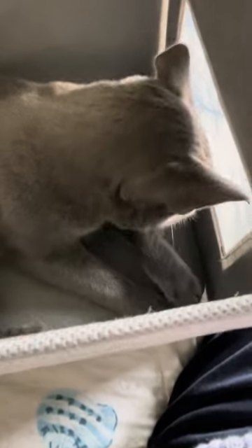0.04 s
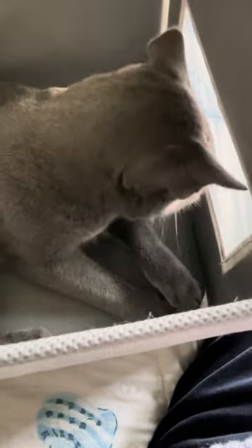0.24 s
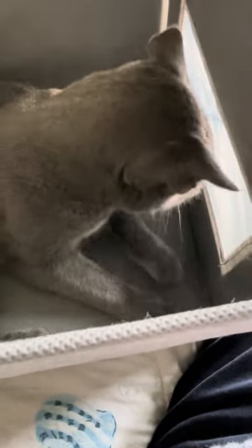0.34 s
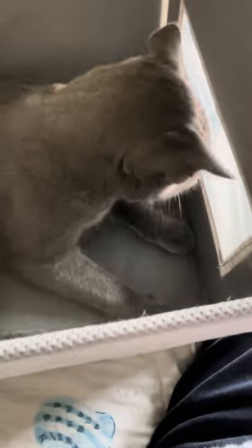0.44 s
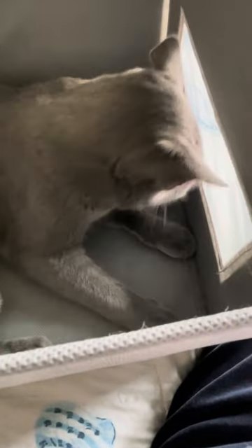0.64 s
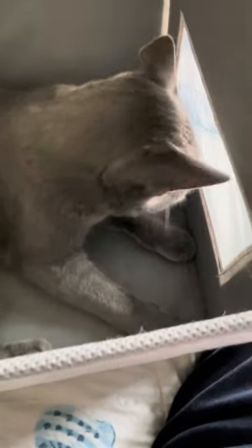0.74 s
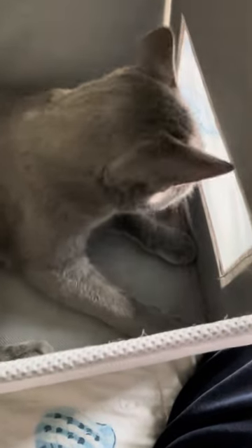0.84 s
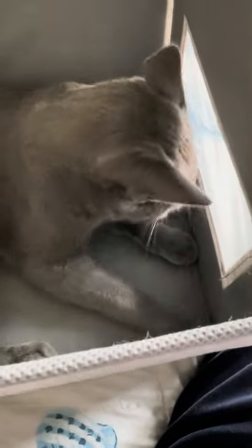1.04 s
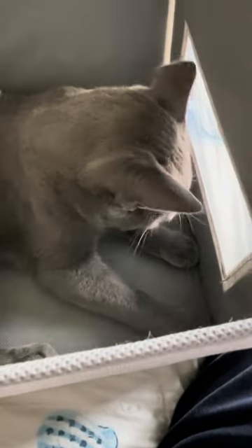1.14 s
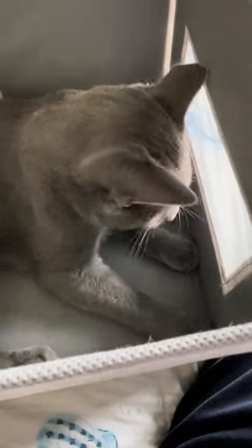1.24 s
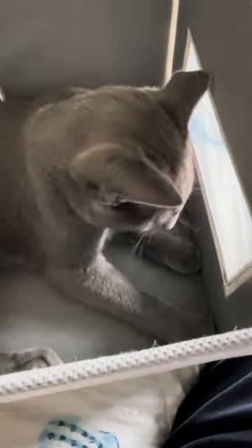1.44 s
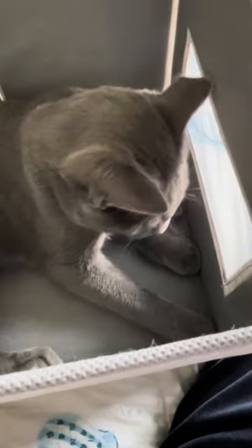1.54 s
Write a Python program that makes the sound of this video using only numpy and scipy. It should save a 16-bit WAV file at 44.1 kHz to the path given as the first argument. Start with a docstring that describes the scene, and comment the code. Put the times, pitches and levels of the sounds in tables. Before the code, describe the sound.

A kitten's paw knocks a cardboard box with one deep, hollow boom; after a near-quiet gap come light taps, claw ticks and soft rubs. Close stereo microphone in a small quiet room with a faint low hum.

```python
"""A cardboard box booms under one firm knock from a kitten's paw, close up in a quiet room.
The knock runs through the board as a fast falling chirp, and decaying sines ring the box after it.
Around it come soft rubs of filtered slips and noise, noisy claw ticks and tiny falling squeaks;
lighter paw taps follow as smaller chirps. Steady sines and coloured noise lie underneath as a low hum.
Noise tails add the box walls and the room."""
import sys
import numpy as np
from scipy import signal
from scipy.fft import rfft, irfft
from scipy.io import wavfile

SR = 44100
rng = np.random.default_rng(int(sys.argv[2]) if len(sys.argv) > 2 else 0)


def inscribe(sig):
    """Save sig as 16-bit PCM at rate SR to the path in sys.argv[1].

    A 1-D sig is mono; a 2-D sig holds one channel per row.
    Samples are clipped to [-1, 1] before scaling.
    """
    pcm = np.round(np.clip(np.atleast_2d(sig).T, -1, 1) * 32767)
    wavfile.write(sys.argv[1], SR, pcm.astype(np.int16))


N = 70560  # length in samples: 1.6 s


def amp(db):
    """Turns decibels into gain."""
    return 10 ** (np.asarray(db) / 20)


def unit(x):
    """Scales a signal to rms 1."""
    return x / np.sqrt(np.mean(x ** 2) + 1e-20)


def read(points, hz):
    """Reads a table with straight lines on a log-frequency axis."""
    f, value = np.transpose(points)
    return np.interp(np.log(hz + 1), np.log(f + 1), value)


def freqs(size):
    """Gives the bin frequencies of a transform, in Hz."""
    return np.fft.rfftfreq(size, 1 / SR)


def add(mix, s, sound):
    """Mixes a sound in at time s, cut off at the end of the mix."""
    part = mix[max(round(s * SR), 0):][:len(sound)]
    part += sound[:len(part)]


# likeness of left and right in diffuse sound: f/Hz, likeness (0 unrelated, 1 identical)
STEREO_LIKENESS = [(100, 0.98), (330, 0.65), (600, 0.61), (2000, 0), (5000, 0.8), (7200, 1), (8100, 1),
                   (12000, 0.5)]


def diffuse(pair, colour):
    """Colours two unrelated signals and blends them so that each band is partly alike left and right."""
    hz = freqs(N)
    a, b = rfft(pair, N)
    same = np.clip(read(STEREO_LIKENESS, hz), -1, 1)
    partner = same * a + np.sqrt(1 - same ** 2) * b
    return irfft(np.array([a, partner]) * amp(read(colour, hz)), N)


# steady hum partials: f/Hz, level/dB (rms)
HUM_PARTIALS = [(59.2, -61.5), (118.4, -64.5), (177.6, -76.5)]
# relative colour of the room noise: f/Hz, level/dB per Hz
NOISE_COLOUR = [(20, -16), (40, -2.5), (65, 1), (100, 1.5), (135, -5), (180, -19), (260, -18.5),
                (400, -32.5), (800, -37.5), (1800, -38), (3200, -42.5), (6500, -46), (11000, -53),
                (16000, -66)]
NOISE_DB = -61  # overall rms level


def background():
    """Steady sines make the low hum; coloured diffuse noise makes the faint air of the room."""
    t = np.arange(N) / SR
    hum = sum(amp(db) * np.sqrt(2) * np.sin(2 * np.pi * (hz * t + rng.random()))
              for hz, db in HUM_PARTIALS)
    noise = unit(diffuse(rng.standard_normal((2, N)), NOISE_COLOUR))
    return hum + amp(NOISE_DB) * noise


# faint squeaks as the paw slips on the board: t/s, length/s, start f/Hz, end f/Hz, peak level/dB
SLIP_SQUEAKS = [(0.039, 0.061, 1570, 1554, -81), (.76, 0.11, 524, 450, -74.5),
                (1.0612, 0.0026, 4520, 4380, -57.5)]


def squeaks():
    """Stick-slip sings a short tone that falls in pitch while it swells and fades."""
    out = np.zeros(N)
    for s, length, start_hz, end_hz, db in SLIP_SQUEAKS:
        u = np.linspace(0, 1, round(length * SR))
        pitch = start_hz + (end_hz - start_hz) * u
        tone = np.sin(2 * np.pi * np.cumsum(pitch) / SR)
        add(out, s, amp(db) * np.sin(np.pi * u) * tone)
    return out


BASS_HZ, TREBLE_HZ = 445, 3500  # shelf corners


def shelves(hz, bass_db, treble_db):
    """Gives the gain of smooth bass and treble shelves, in dB."""
    bass = bass_db / (1 + (hz / BASS_HZ) ** 4)
    treble = treble_db * hz ** 2 / (hz ** 2 + TREBLE_HZ ** 2)
    return bass + treble


DISPERSION = .88  # exponent: how steeply the travel time in the board grows towards the bass
HOLLOW_OCTAVES = 0.32  # spread of the hollow resonance


def blow(colour, db, bass_db=0, treble_db=0, travel_s=0, hollow_hz=1000, hollow_db=0, size=8192):
    """Bending waves disperse a coloured impulse: treble arrives first, so it chirps downwards."""
    hz = freqs(size)
    octaves = np.log2((hz + 1) / hollow_hz)
    hollow = hollow_db * np.exp(-.5 * (octaves / HOLLOW_OCTAVES) ** 2)
    log_gain = np.log(amp(read(colour, hz) + db + shelves(hz, bass_db, treble_db) + hollow))
    # minimum phase keeps the impulse causal
    phase = -signal.hilbert(np.r_[log_gain, log_gain[-2:0:-1]]).imag[:len(hz)]
    # travel_s holds at 1 kHz; the delay stops growing below 70 Hz
    delay = travel_s * (1000 / np.maximum(hz, 70)) ** DISPERSION
    travel_phase = 2 * np.pi * np.cumsum(delay) * hz[1]
    wave = irfft(np.exp(log_gain + 1j * (phase - travel_phase)))
    return wave[:size // 2] * signal.windows.tukey(size, .5)[size // 2:]


# claws catching the board: t/s, level/dB, treble shelf level/dB
CLAW_TICKS = [(.233, -41, -12), (.3625, -43.5, -13), (0.773, -44.5, -14), (0.854, -52, 9),
              (1.1481, -38.5, 8), (1.158, -53, 12), (1.1806, -40, 6.5), (1.2255, -27.5, 0.5),
              (1.232, -32.5, -23), (1.236, -41, -19), (1.382, -51, -11), (1.3916, -26, -1.5),
              (1.3997, -27.5, -9.5), (1.479, -46.5, 1), (1.554, -36, -12), (1.5591, -38, -6)]
# colour of a claw tick: f/Hz, level/dB
CLAW_COLOUR = [(100, -12), (600, -6), (1300, 3), (2400, 1.5), (3300, -9.5), (5200, -1), (7500, 1),
               (10000, -3), (13000, -14.5), (16000, -21.5)]
TICK_CRUMBLE, TICK_DECAY_S = 0.64, .0005  # fibre noise against the snap, and its decay time
TICK_TRAVEL_S = 0.00068  # at 1 kHz


def claws(size=512):
    """A claw snaps off the board in one sharp click, with a brief crumble of noisy fibres."""
    out, t = np.zeros(N), np.arange(size) / SR
    crumbles = rng.standard_normal((len(CLAW_TICKS), size))
    for (s, db, treble_db), fibres in zip(CLAW_TICKS, crumbles):
        snap = (t == 0) + TICK_CRUMBLE * fibres * np.exp(-t / TICK_DECAY_S)
        snap = snap / np.linalg.norm(snap)
        board = blow(CLAW_COLOUR, db, treble_db=treble_db, travel_s=TICK_TRAVEL_S)
        add(out, s, np.convolve(snap, board))
    return out


# paw and fur strokes: peak t/s, half width/s, level/dB, bass shelf level/dB, treble shelf level/dB
RUB_STROKES = [(.236, .006, -67.5, 15, -10), (.252, .003, -48, -3, -4.5), (.295, 0.024, -69.5, 10, -3),
               (0.397, 0.0091, -74.5, 10, -9), (.424, 0.017, -72, 19, 6.5), (.6, 0.074, -84.5, 3.5, 7),
               (0.673, 0.029, -74.5, 3, 2.5), (0.744, 0.015, -79, -22.5, -2.5),
               (0.779, 0.015, -65.5, -16, -5), (0.818, 0.015, -66.5, -13, -11.5),
               (.86, .025, -82.5, -1.5, 6), (0.959, 0.042, -81.5, 13.5, 2), (1.089, .014, -71, 14.5, 8),
               (1.124, 0.024, -75.5, 20.5, -15), (1.192, 0.024, -73, 8, 7.5),
               (1.232, 0.015, -61.5, 7, -10.5), (1.336, 0.013, -66.5, -5, -3), (1.394, 0.0098, -66, 17, 2),
               (1.413, 0.03, -73.5, 17.5, -5.5), (1.492, .018, -75.5, 12.5, 8), (1.56, 0.018, -70, 4.5, 5)]
# relative colour of the friction: f/Hz, level/dB per Hz
FRICTION_COLOUR = [(30, -1), (90, 11.5), (230, 12), (400, 7), (750, -2), (1300, 1), (2200, 3), (3300, -7),
                   (5500, -5.5), (7500, -11), (11000, -16.5), (13000, -20.5), (16000, -43.5)]
GRAINS_PER_S, GRAIN_SPREAD_DB = 1300, 4  # slip rate, and mean rise of slip size before the cap
RUB_SMOOTH = 0.56  # fur noise against the slips, as an rms ratio
CATCH_DB, CATCH_S = 1.16, .005  # rms unevenness of the pressure, and its smoothing time


def rubs():
    """Dense tiny slips and smooth fur noise swell and fade with each stroke, catching unevenly."""
    t, hz = np.arange(N) / SR, freqs(N)
    sizes = amp(GRAIN_SPREAD_DB * np.minimum(rng.exponential(1, (2, N)), 4))
    struck = rng.random((2, N)) < GRAINS_PER_S / SR
    slips = sizes * rng.choice([-1, 1], (2, N)) * struck
    fur = RUB_SMOOTH * rng.standard_normal((2, N))
    slow_noise = irfft(rfft(rng.standard_normal(N)) * np.exp(-(hz * CATCH_S) ** 2), N)
    pressure = amp(CATCH_DB * unit(slow_noise))
    friction = rfft(unit(diffuse((unit(slips) + fur) * pressure, FRICTION_COLOUR)))
    out = np.zeros((2, N))
    for s, width, db, bass_db, treble_db in RUB_STROKES:
        stroke = irfft(friction * amp(db + shelves(hz, bass_db, treble_db)), N)
        out += stroke * np.exp(-.5 * ((t - s) / width) ** 2)
    return out


# colour of the knock's bending wave: f/Hz, level/dB
KNOCK_WAVE = [(25, -8.5), (50, -9), (72, 21.5), (95, 29), (125, 33), (160, 12), (220, 28), (305, 25),
              (400, 13), (550, 0.5), (1000, 5.5), (1600, 0), (2200, 0), (3100, -12.5), (4800, -13.5),
              (9500, -16), (12000, -31), (16000, -30)]
# ringing of the box: f/Hz, level/dB, t60/s
BOX_RINGING = [(90.4, -18, 0.11), (123.3, -34.5, 0.29), (217.8, -30, 0.21), (341.4, -47.5, .13),
               (507, -47, 0.2)]
KNOCK_S, KNOCK_DB = .2405, 0
KNOCK_TRAVEL_S = 0.002243  # at 1 kHz
BOX_LAG_S, BOX_RISE_S = .018, 0.0088  # the ringing starts after the knock and builds up


def knock():
    """A firm blow chirps through the board, then the box modes build up and ring down."""
    out, t = np.zeros(N), np.arange(SR // 2) / SR
    add(out, KNOCK_S, blow(KNOCK_WAVE, KNOCK_DB, travel_s=KNOCK_TRAVEL_S))
    ring = sum(amp(db - 60 * t / t60) * np.sin(2 * np.pi * hz * t) for hz, db, t60 in BOX_RINGING)
    add(out, KNOCK_S + BOX_LAG_S, ring * (1 - np.exp(-t / BOX_RISE_S)))
    return out


# light paw taps: t/s, level/dB, bass shelf level/dB, treble shelf level/dB, hollow f/Hz, hollow level/dB
PAW_TAPS = [(.41, -42.5, 26.5, -4, 81, 9), (1.0626, -25.5, -5.5, -12.5, 720, 9.5),
            (1.0847, -32.5, 19.5, -8, 357, 9.5), (1.127, -32, 0, -23, 1240, 9),
            (1.3127, -36, -2, -15, 1710, 11.5), (1.3246, -18, -2.5, -5.5, 940, 7),
            (1.3384, -20.5, 6.5, -11, 910, 5.5), (1.346, -34, 20, -3, 2330, 11),
            (1.3835, -12.5, 2, -4.5, 223, 1), (1.5235, -33.5, -4, -15, 625, 21),
            (1.527, -32.5, -11, 4.5, 2370, 13.5), (1.542, -28.5, 6.5, -18, 576, 9.5),
            (1.5581, -32, 4.5, 0, 1490, 11)]
# shared colour of the taps: f/Hz, level/dB
PAW_COLOUR = [(40, 5.5), (120, -0.5), (220, 5.5), (350, -2.5), (550, -4), (900, -2.5), (1500, -9),
              (2500, -17), (5000, -20.5), (9000, -23.5), (16000, -46)]
TAP_TRAVEL_S = 0.001586  # at 1 kHz


def taps():
    """Light taps chirp through the same board, each spot with its own hollow pitch."""
    out = np.zeros(N)
    for s, db, bass_db, treble_db, hollow_hz, hollow_db in PAW_TAPS:
        add(out, s, blow(PAW_COLOUR, db, bass_db, treble_db, TAP_TRAVEL_S, hollow_hz, hollow_db))
    return out


# colour of the close reflections from the box walls: f/Hz, level/dB
WALL_REFLECTIONS = [(100, -57.5), (400, -35.5), (800, -10), (2000, -4.5), (3500, -4), (6000, -12.5),
                    (10000, -14.5), (16000, -13.5)]
WALL_DECAY_S, WALL_LAG_S = 0.00253, .0004


def walls(x):
    """The box walls scatter each sound into a few milliseconds of decaying noise."""
    t = np.arange(N) / SR
    echoes = rng.standard_normal((2, N)) * (t > WALL_LAG_S) * np.exp(-t / WALL_DECAY_S)
    echoes = diffuse(echoes / np.linalg.norm(echoes, axis=1, keepdims=True), WALL_REFLECTIONS)
    return signal.fftconvolve(x[None], echoes[:, :SR // 10], axes=1)[:, :N]


# decay of the room tail: f/Hz, t60/s
ROOM_DECAY = [(80, 0.75), (300, 0.19), (1000, 0.16), (2500, 0.3), (5000, 0.3), (12000, 0.2)]
# colour of the room tail: f/Hz, level/dB
ROOM_TONE = [(60, -9.5), (200, -15.5), (400, -11.5), (650, -2), (1100, -15.5), (2200, -13.5), (4500, -13.5),
             (9000, -21.5), (13000, -7), (16000, -33.5)]
ROOM_LAG_S = .003


def room(x):
    """A small furnished room answers with a noise tail, each band dying at its own speed."""
    hz, t, bands = signal.stft(rng.standard_normal((2, SR // 2)), SR, nperseg=256)
    t60 = read(ROOM_DECAY, hz)[:, None]
    # the root evens out the energy of short and long decays
    bands = bands * amp(-60 * t / t60) * np.sqrt(2 * np.log(1000) / (t60 * SR))
    tail = signal.istft(bands, SR, nperseg=256)[1]
    tail = diffuse(tail, ROOM_TONE)[:, :SR // 2]
    tail = np.pad(tail, ((0, 0), (round(ROOM_LAG_S * SR), 0)))
    return signal.fftconvolve(x[None], tail, axes=1)[:, :N]


# stereo balance of the blows: f/Hz, left minus right level/dB
BLOW_BALANCE = [(100, -.3), (330, -.7), (750, -4.5), (1100, -6), (2000, 0), (4300, -3), (8000, 0),
                (16000, -1)]


def scene():
    """Places the blows slightly to the right and joins claws, squeaks, rubs, reflections and hum."""
    blows = knock() + taps()
    scratches = claws() + squeaks()
    balance = amp(np.outer([.5, -.5], read(BLOW_BALANCE, freqs(N))))
    placed = irfft(rfft(blows) * balance, N)
    struck = blows + scratches
    return placed + scratches + walls(struck) + room(struck) + rubs() + background()


# phase between left and right: f/Hz, phase/rad
STEREO_PHASE = [(100, 0), (380, 0.4), (600, 2), (1000, 1.4), (2200, -0.15), (4000, 0.83), (6300, 2.16),
                (7200, 2.5), (8100, 3.5), (8900, 1.24), (12000, 0.5), (16000, 6.2)]
EDGE_HZ = 16300  # top of the band


def record(dry):
    """Turns left and right apart in phase, then low-passes both."""
    turn = np.exp(1j * np.outer([.5, -.5], read(STEREO_PHASE, freqs(N))))
    turned = irfft(rfft(dry) * turn, N)
    lowpass = signal.firwin(255, EDGE_HZ, window=("kaiser", 9), fs=SR)
    return signal.oaconvolve(turned, lowpass[None], "same")


dry = scene()
out = record(dry)
inscribe(out)
```